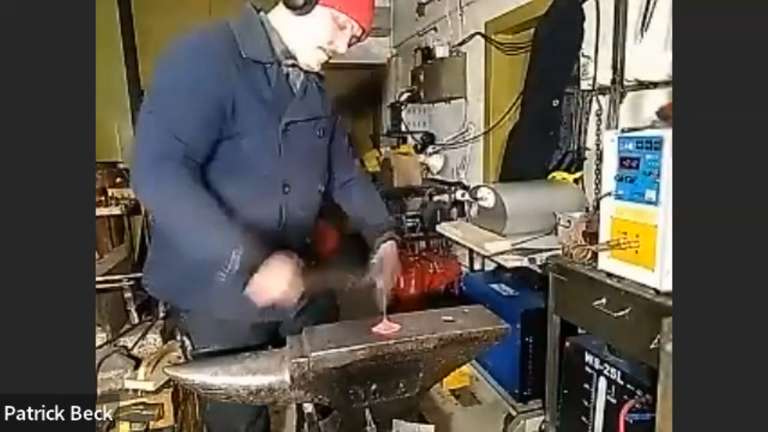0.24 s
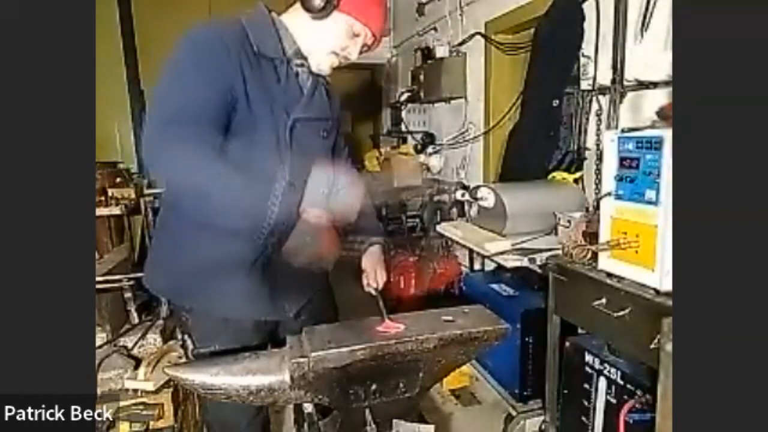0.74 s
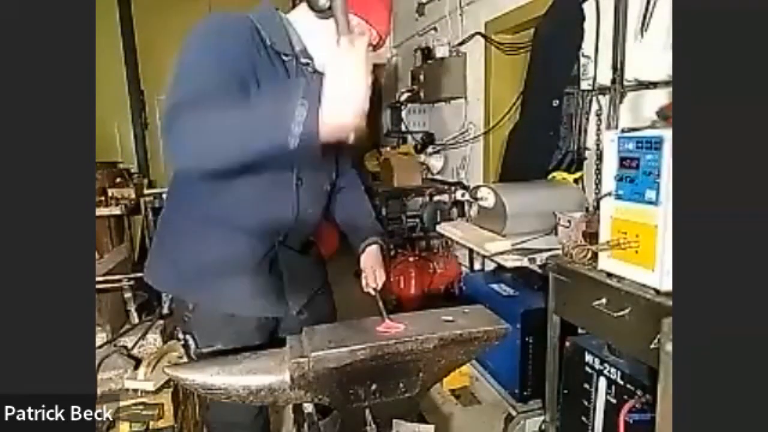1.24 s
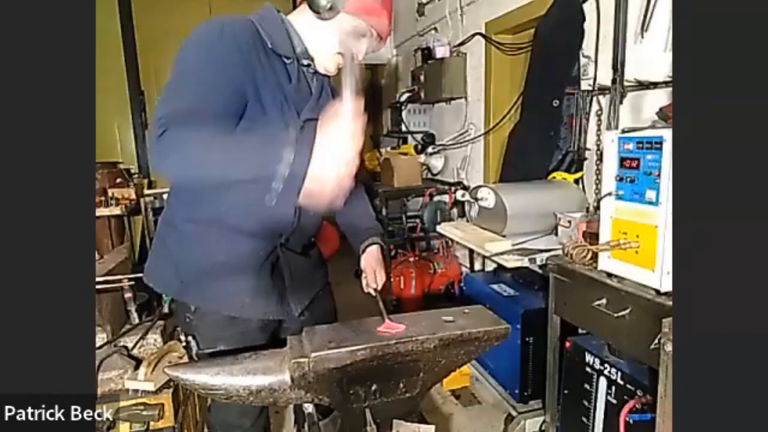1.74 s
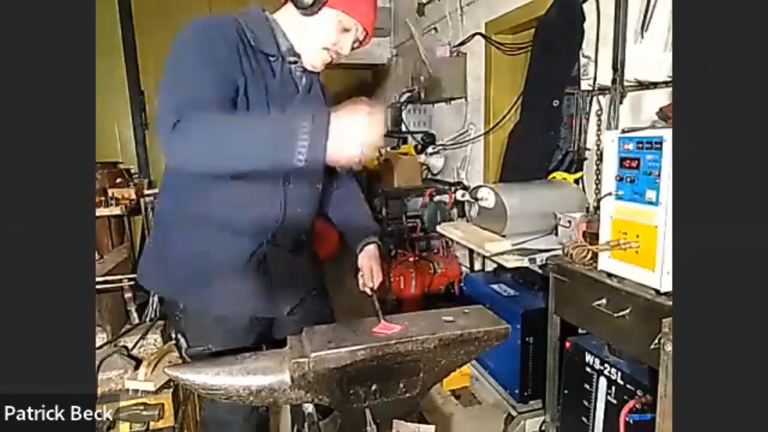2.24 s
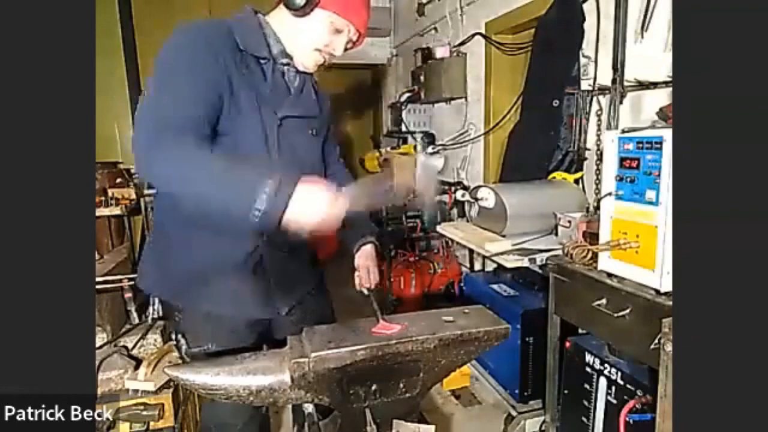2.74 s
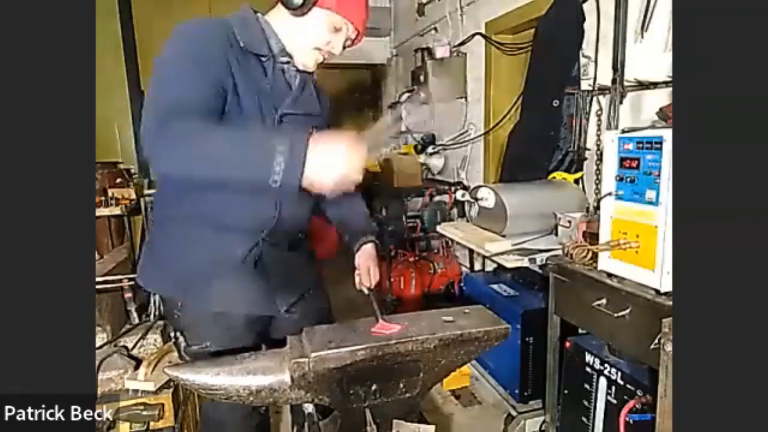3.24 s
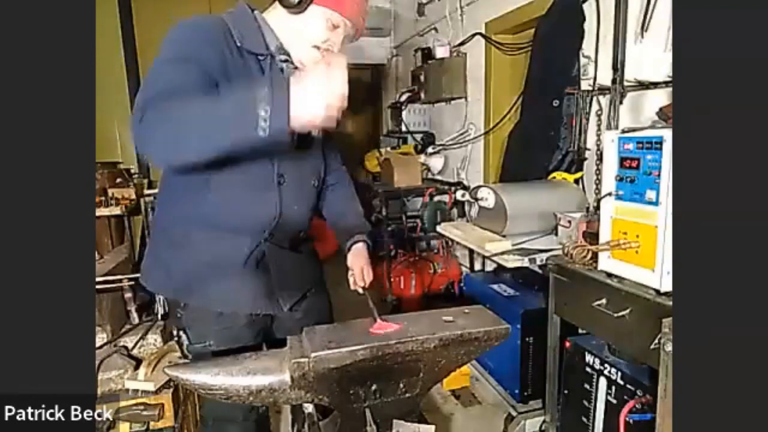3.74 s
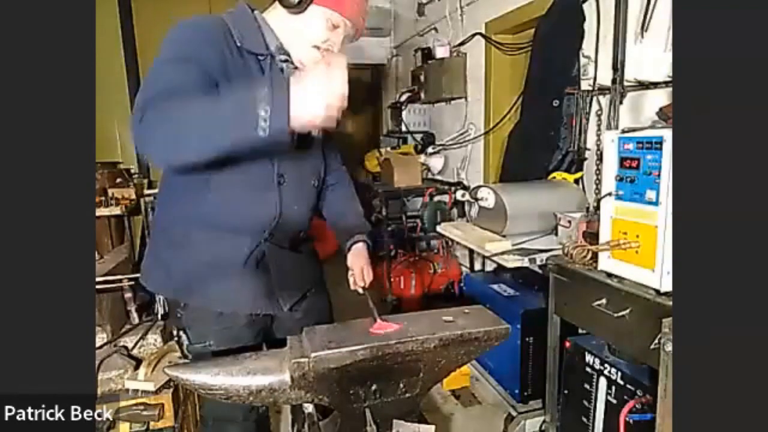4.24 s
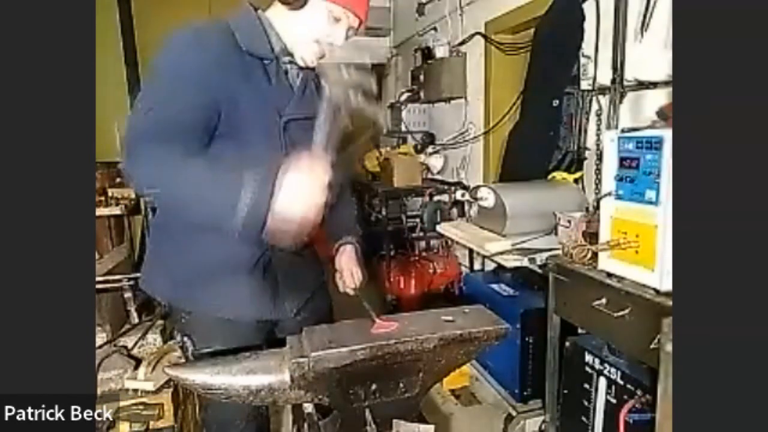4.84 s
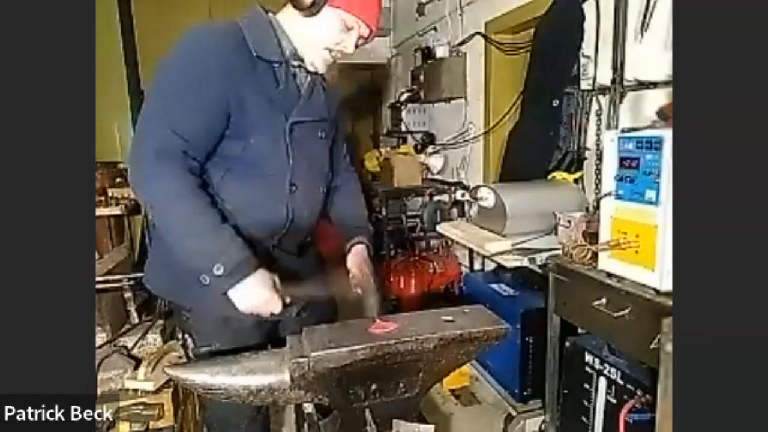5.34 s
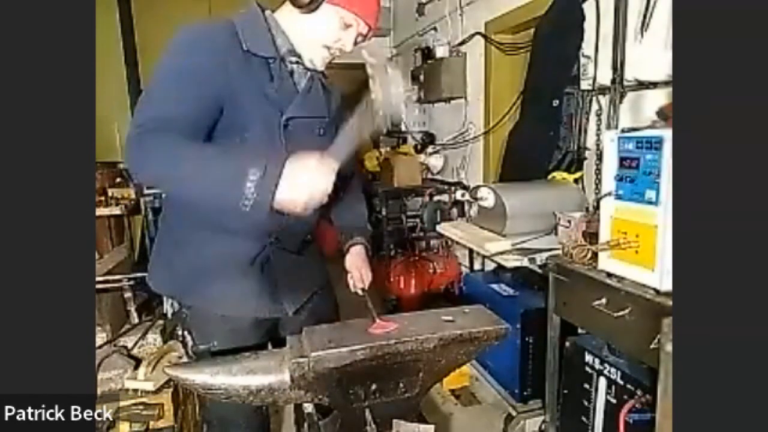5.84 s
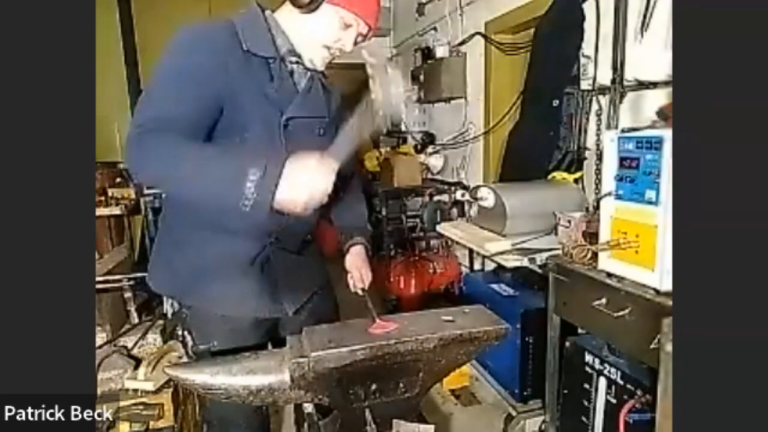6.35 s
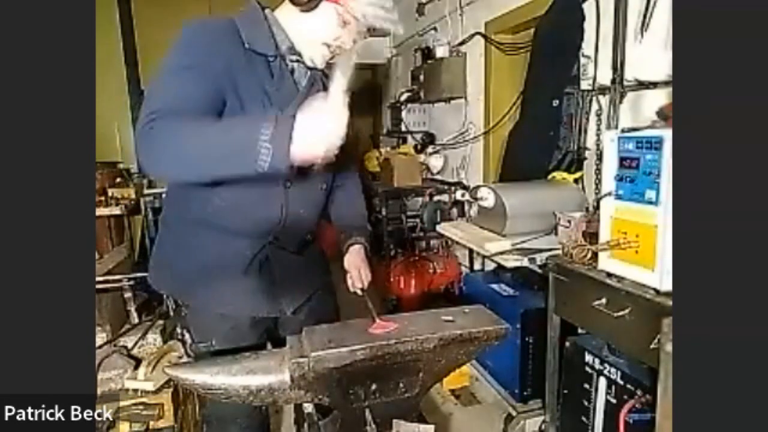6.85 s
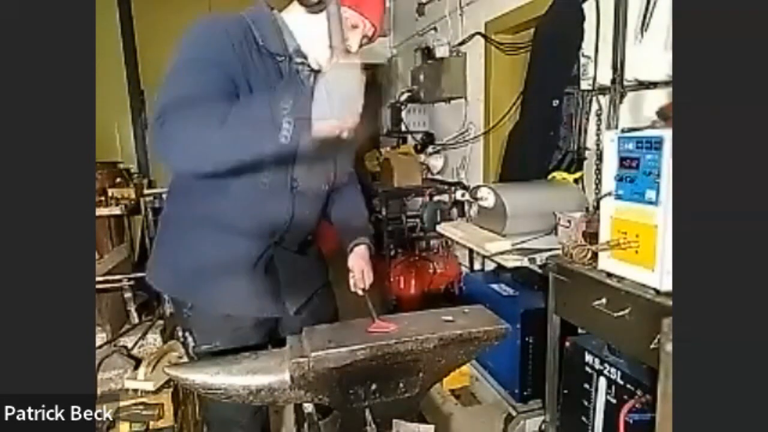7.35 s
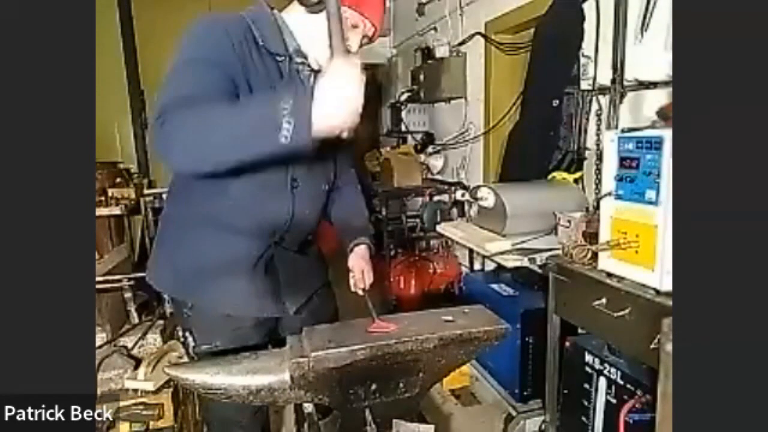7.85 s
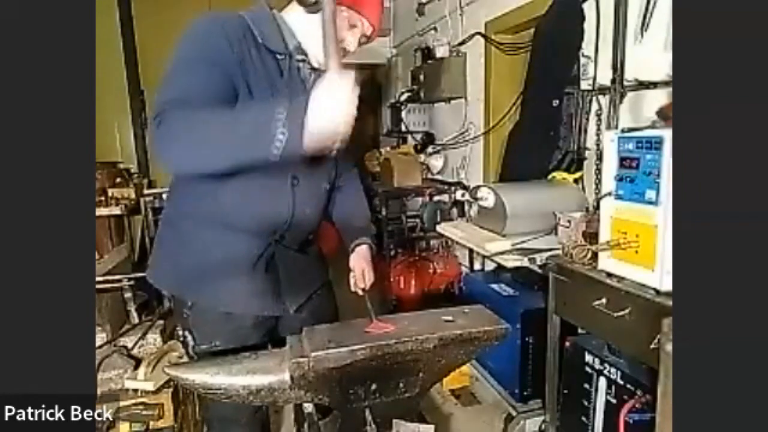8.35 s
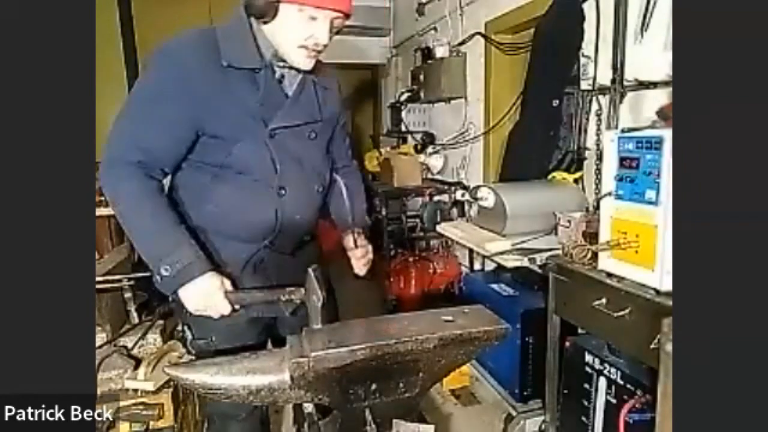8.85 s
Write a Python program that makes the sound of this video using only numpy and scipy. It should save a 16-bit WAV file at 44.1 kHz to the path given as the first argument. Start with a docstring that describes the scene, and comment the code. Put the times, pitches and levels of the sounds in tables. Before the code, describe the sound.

A hammer beats hot steel on an anvil about twice a second, each blow a ringing metallic clang in a small workshop.

```python
"""A hand hammer beats hot steel on an anvil, about two blows a second, in a small, live workshop.
Each blow sets the modes of anvil and hammer ringing, fills the room with a dying clang and gives the
stump below a short thump. The microphone feeds a mono call link: its noise suppressor cuts the tails
short and its limiter holds the first fifth of a second of each blow flat. A faint sizzle near 13 kHz
from the link follows each blow; faint hiss and flickering tones lie underneath."""
import sys
import numpy as np
from scipy import signal
from scipy.fft import rfft, irfft
from scipy.io import wavfile
from scipy.ndimage import uniform_filter1d, minimum_filter1d

SR = 44100
rng = np.random.default_rng(int(sys.argv[2]) if len(sys.argv) > 2 else 0)


def store_pcm(level_fs):
    """Save levels as 16-bit WAV."""
    pcm = np.round(np.clip(level_fs, -1, 1) * 32767).astype(np.int16)
    wavfile.write(sys.argv[1], SR, np.atleast_2d(pcm).T)


N = 401751

# hammer blows: (time [s], strength [dB], thump over strength [dB], treble decay stretch [x],
# then the landing [unitless]: glancing, along the face, across the face, hammer tilt)
BLOWS = [(0.017, -13, -20, 1.34, 2.18, -0.05, -1.64, 1.5), (0.519, -6.5, -24, 0.92, -3.27, 4, 2, 2),
         (1.033, -5, -23.5, 0.93, -1.9, 3.14, 0.56, 1.3), (1.547, -1, -10.5, 0.88, -2, 2.2, 1.2, -0.33),
         (2.12, -4.5, -28.5, 1.026, 3, -0.5, -0.24, -0.4),
         (2.656, -0.5, -36, 1.08, -1.05, -0.17, 0.58, 0.24),
         (3.148, -0.1, -13.5, 0.97, 0.5, 0.1, 1.05, -0.83),
         (3.628, 2.6, -33, 0.94, -0.3, -0.5, -0.042, -0.6),
         (4.121, -1.0, -32, 1.104, -0.16, -0.77, 0.21, -0.83),
         (4.648, 2.6, -26, 1.03, -1.15, -0.46, -0.11, 0.099), (5.158, 1.5, 5.5, 0.98, -1.5, 0.2, 0.37, 0.2),
         (5.694, 1.95, -6, 1.05, -2.1, -0.8, -0.18, 0.42),
         (6.195, -1.5, -13.5, 1.01, 1.16, 1.41, -0.59, -1.6),
         (6.737, 1, -20, 1.002, -2.34, -0.6, -0.036, -0.1), (7.255, -6, -11, 0.87, 1.16, 0.5, -1.73, 0.55),
         (7.827, -2, -20, 0.87, 0, 0.4, -1.2, -0.7), (8.351, -2.3, -25, 1.03, 0.1, 1.06, -1.42, 0.047),
         (8.864, 2, -1.5, 0.96, 0.7, -0.5, -0.5, -0.57)]
# reverberation of the workshop: (frequency [Hz], t60 [s])
ROOM_T60 = [(150, 0.53), (400, 0.53), (1500, 0.65), (4000, 0.58), (8000, 0.38), (12000, 0.59)]


def amp(db):
    return 10 ** (np.asarray(db) / 20)


def rms_one(x):
    return x / np.sqrt(np.mean(x ** 2) + 1e-20)


def at_hz(points, hz, column=1):
    """Read a table between its rows on a log frequency axis."""
    points = np.array(points)
    return np.interp(np.log(hz), np.log(points[:, 0]), points[:, column])


def drift(rate_hz):
    """Random wander below rate_hz, rms 1."""
    smooth = signal.butter(2, rate_hz, fs=SR, output="sos")
    return rms_one(signal.sosfilt(smooth, rng.standard_normal(N + 9000))[9000:])


def noise_bands(spectrum):
    """Steady noise of the given spectrum, at rms 1, split into third octaves: [(centre Hz, band)]."""
    hz = np.maximum(np.arange(N // 2 + 1) * SR / N, 1)
    shaped = rfft(rng.standard_normal(N)) * amp(at_hz(spectrum, hz))
    bins = rfft(rms_one(irfft(shaped, N)))
    thirds = 3 * np.log2(hz)
    return [(2 ** (k / 3), irfft(bins * np.maximum(1 - abs(thirds - k), 0), N)) for k in range(14, 43)]


def latest_blow():
    """Index of the blow sounding at each sample."""
    return np.maximum(np.searchsorted(np.array(BLOWS)[:, 0], np.arange(N) / SR) - 1, 0)


def struck(level_db, t60, rise_s):
    """Envelope: each blow swells with time constant rise_s and dies with its t60."""
    starts, blow = np.array(BLOWS)[:, 0], latest_blow()
    age = np.maximum(np.arange(N) / SR - starts[blow], 0)
    fallen_db = 60 * age / np.broadcast_to(t60, starts.shape)[blow]
    return amp(level_db[blow] - fallen_db) * -np.expm1(-age / rise_s)


def low_lag_db(even_db=-6.5, loss_per_db=0.76):
    """Gain per blow: harder blows add less to the lows."""
    return loss_per_db * (even_db - np.array(BLOWS)[:, 1])


def link_hiss(level_db=-81.5):
    """The call link's own faint, steady noise."""
    # hiss spectrum: (frequency [Hz], relative density [dB])
    spectrum = [(40, -5), (110, 0), (600, -7), (2000, -13), (11000, -20), (13000, -29)]
    return amp(level_db) * sum(band for _, band in noise_bands(spectrum))


def flickers():
    """Faint, soft-edged tones flicker up in the tails, each with a rough flutter."""
    # tones: (centre time [s], pitch [Hz], level [dB], length [s])
    tones = [(0.35, 500, -53.5, 0.037), (0.886, 575, -49.5, 0.086), (1.314, 870, -47, 0.013),
             (1.386, 500, -43, 0.026), (0.344, 4220, -64, 0.076), (1.923, 4230, -60, 0.11),
             (2.404, 850, -41.5, 0.015), (2.527, 560, -54.5, 0.035), (2.575, 1155, -59, 0.056),
             (2.576, 570, -60.5, 0.046), (2.585, 1880, -61.5, 0.046), (2.937, 870, -44, 0.015),
             (2.994, 560, -49, 0.019), (3.025, 688, -54.5, 0.069), (3.497, 663, -49, 0.053),
             (3.526, 239, -51.5, 0.037), (4.384, 840, -41, 0.012), (4.455, 248, -49, 0.038),
             (5.514, 557, -59.5, 0.044), (5.566, 860, -58.5, 0.065), (8.116, 321, -37.5, 0.046),
             (8.196, 3850, -66, 0.11), (8.199, 582, -53.5, 0.044), (8.221, 877, -52.5, 0.049),
             (8.638, 855, -50, 0.015)]
    out, t = np.zeros(N), np.arange(N) / SR
    for centre_s, hz, level_db, length_s in tones:
        near = slice(max(int((centre_s - .15) * SR), 0), int((centre_s + .15) * SR))
        swell = np.exp(-(2 * (t[near] - centre_s) / length_s) ** 2)
        out[near] += amp(level_db) * swell * np.sin(2 * np.pi * hz * t[near])
    return out * (1 + .6 * drift(110))


def stump_thump(hz=190, t60=0.018, late_s=0.0028):
    """The stump under the anvil answers each blow with a short, low push."""
    blows, kicks = np.array(BLOWS), np.zeros(N)
    kicks[((blows[:, 0] + late_s) * SR).astype(int)] = amp(blows[:, 1] + blows[:, 2])
    r, w = amp(-60 / (t60 * SR)), 2 * np.pi * hz / SR
    return signal.lfilter([0, np.sin(w)], [1, -2 * r * np.cos(w), r * r], kicks + 1e-18)


def room_clang(gain_db=-6, treble_db=2, rise_s=0.014, lumpy_db=2.08):
    """Dense small modes and the room merge to noise that dies band by band, in lumps as modes beat."""
    # clang spectrum: (frequency [Hz], relative density [dB])
    spectrum = [(30, -21.5), (340, -3.5), (500, -8), (800, -3.5), (1050, -8.5), (1650, -5), (2450, -7.5),
                (2950, -12.5), (4460, -13), (6000, -12), (7300, -10.5), (8500, -13.5), (11000, -19),
                (14500, -47.5)]
    # answer to the landing, lows then highs: (glancing, along, across, tilt) [dB per unit]
    landing_answer = [(0.37, 0.64, 0.1, 0.3), (-0.08, 0.1, 0.4, -0.3)]
    out, blows = 0, np.array(BLOWS)
    lumps = [drift(9) for _ in range(7)]
    for k, (hz, band) in enumerate(noise_bands(spectrum)):
        low = at_hz([(600, 0.95), (2000, 0.26)], hz)
        high = at_hz([(2500, 0.36), (6000, 0.86)], hz)
        landing_db = blows[:, 4:] @ (np.array([low, high]) @ landing_answer)
        level_db = blows[:, 1] + gain_db + low * low_lag_db() + high * treble_db + landing_db
        t60 = at_hz(ROOM_T60, hz) * blows[:, 3] ** high
        out += band * struck(level_db, t60, rise_s) * amp(lumpy_db * lumps[k % 7])
    return out


def anvil_ring_and_sizzle(echo_rise_s=0.0024, main_ring_lag=0.15):
    """Anvil and hammer modes reach the microphone as sines plus narrow noise off the walls.
    The top partial, near 13 kHz, is a faint sizzle from the call link that follows each blow."""
    # partials, the metal's modes and last the link's sizzle: (pitch [Hz])
    partial_hz = [(305), (361), (791), (899), (1443), (1561), (1717), (2040), (2676), (3262), (3311),
                  (3770), (4129), (4500), (5405), (5486), (6083), (6573), (6831), (7267), (7483), (8963),
                  (10185), (10993), (11079), (11477), (12920)]
    # the same partials: (level [dB], t60 [s])
    partial_decay = [(-20, 0.66), (-10, 0.43), (-20, 0.81), (-20, 0.44), (-22, 0.4), (-7, 0.66),
                     (-24.5, 0.36), (-18.5, 0.51), (-25.5, 0.47), (-24.5, 0.48), (-26, 0.7), (-23, .6),
                     (-27.5, 0.57), (-17.5, 0.51), (-30, 0.5), (-26, 0.46), (-33.5, 0.95), (-21.5, 0.62),
                     (-27.5, 1), (-23.5, 0.69), (-11.5, 0.44), (-35, 0.39), (-21.5, 0.29), (-23, 0.72),
                     (-19.5, 0.55), (-26.5, .55), (-25, 0.92)]
    # steadiness of the partials: (frequency [Hz], sine amplitude [0-1], waver width [Hz])
    waver = [(400, .4, 40), (1400, .4, 35), (1561, .78, 22), (1750, .4, 40), (3300, .4, 30),
             (4500, .05, 200), (5450, .15, 60), (6900, .15, 55), (7483, .4, 45), (11079, .5, 45),
             (11477, .1, 450)]
    # swell of the partials: (frequency [Hz], build-up [s])
    build_up = [(1400, .012), (1561, .3), (1717, .08), (1800, .015), (7483, .02), (10185, .004),
                (11000, .1)]
    # families of partials: (centre [Hz])
    family_hz = [1560, 1717, 2040, 2680, 3262, 3311, 3770, 4400, 5450, 6570, 7480, 10180, 11050, 11500]
    # each family's answer to the landing: (glancing, along, across, tilt) [dB per unit]
    family_answer = [(1.15, 0.96, 0.65, 2.1), (-0.5, -1, -8.5, -4), (-1, 1.2, 0.7, -0.2),
                     (-0.7, -3.2, -9, -4), (2.9, -2, -4, -1.5), (0.1, -5.5, 6, -2), (1.35, -3.5, 2.5, -0.5),
                     (-0.9, -5.5, 2.5, 0.2), (-5.5, 1.3, -6.5, -2.7), (-4, -1.8, -3, 2),
                     (-3, -0.8, -1.2, 0.2), (8, 6.5, 5, -1), (-3, 2, -2, -1.5), (-3.5, -0.5, 7, -4)]
    out, t = 0, np.arange(N) / SR
    blows, blow = np.array(BLOWS), latest_blow()
    white, phases = rng.standard_normal(N), rng.random((len(blows), len(partial_hz)))
    for k, (hz, (level_db, t60)) in enumerate(zip(partial_hz, partial_decay)):
        family = np.argmin(abs(np.log(hz / np.array(family_hz))))
        start_db = blows[:, 1] + level_db
        start_db += blows[:, 4:] @ family_answer[family] if hz > 1200 else low_lag_db()
        if 1200 < hz < 2050:   # harder blows also add a little less to the main ring
            start_db += main_ring_lag * low_lag_db()
        stretch = blows[:, 3] if hz > 3500 else 1
        steady, build_s = at_hz(waver, hz), at_hz(build_up, hz)
        sine = np.sqrt(2) * np.sin(2 * np.pi * (hz * t + phases[blow, k]))
        out += steady * sine * struck(start_db, t60 * stretch, build_s)

        r, w = np.exp(-np.pi * at_hz(waver, hz, column=2) / SR), 2 * np.pi * hz / SR
        noise = rms_one(signal.lfilter([1, 0, -1], [1, -2 * r * np.cos(w), r * r], white))
        noise_db = start_db - (8 if build_s > .2 else 0)   # the slow main ring starts faint
        noise_t60 = min(t60, at_hz(ROOM_T60, hz)) * stretch
        rise_s = echo_rise_s if hz < 2000 else build_s
        out += np.sqrt(1 - steady ** 2) * noise * struck(noise_db, noise_t60, rise_s)
    return out


def scene():
    """Clang, ring with sizzle, and thump, the same in both channels."""
    return np.tile(room_clang() + anvil_ring_and_sizzle() + stump_thump(), (2, 1))


def suppressor(x, slope=2.8, knee_db=5, shut_db=9, shut_slope=3.4, gate_db=-50, gate_slope=0.45):
    """Bands under the assumed noise level are pushed down, then shut; a gate closes on the whole sound."""
    # what the link takes for noise: (frequency [Hz], level per bin [dB])
    noise_floor = [(150, -59), (500, -58), (1560, -56.5), (4000, -70), (8000, -71), (12000, -58.5)]
    hz, _, bins = signal.stft(x, SR, nperseg=1024, noverlap=896)
    hz = np.maximum(hz, 1)
    bands = np.exp(-((hz[:, None] - hz) / (0.12 * hz[:, None] + 30)) ** 2)
    power = bands @ abs(bins) ** 2 / bands.sum(axis=1)[:, None]
    power = abs(uniform_filter1d(power, size=5, axis=1, origin=1)) + 1e-16
    under_db = at_hz(noise_floor, hz)[:, None] - 10 * np.log10(power)
    cut_db = slope * knee_db * np.logaddexp(0, under_db / knee_db)
    cut_db += shut_slope * np.maximum(under_db - shut_db, 0)
    whole_db = 10 * np.log10(np.sum(power * amp(-2 * np.minimum(cut_db, 70)), axis=0))
    cut_db += gate_slope * np.maximum(gate_db - whole_db, 0)
    cut_db += 3 * np.maximum(-64 - whole_db, 0)   # the last of the ring is shut out at once
    return signal.istft(bins * amp(-np.minimum(cut_db, 70)), SR, nperseg=1024, noverlap=896)[1][:N]


def limiter(x, limit_db=-21, sag=0.31, window_s=0.011, memory_s=0.14, ahead_s=0.04):
    """Gain drops ahead of the sound to hold its level at a ceiling that sags after louder peaks."""
    size, back, ahead = int(window_s * SR), int(memory_s * SR), int(ahead_s * SR)
    level_db = 10 * np.log10(abs(uniform_filter1d(x ** 2, size)) + 1e-14)
    peak_db = -minimum_filter1d(-level_db, back + ahead, origin=(back - ahead) // 2)
    ceiling_db = limit_db - sag * np.maximum(peak_db - limit_db, 0)
    gain_db = minimum_filter1d(np.minimum(ceiling_db - level_db, 0), size)
    return x * amp(uniform_filter1d(gain_db, size))


def record(dry, low_hz=100, high_hz=12050, cutoff_hz=14535):
    """The mono call link: band edges, suppressor, limiter, its own tones and hiss, then a top cut."""
    edges = np.vstack([signal.butter(2, low_hz, "high", fs=SR, output="sos"),
                       signal.ellip(6, .5, 16, high_hz, fs=SR, output="sos")])
    top_cut = signal.cheby2(12, 70, cutoff_hz, fs=SR, output="sos")
    microphone = signal.sosfilt(edges, dry[0])
    link = limiter(suppressor(microphone)) + link_hiss() + flickers()
    return np.tile(signal.sosfilt(top_cut, link), (2, 1))


dry = scene()
out = record(dry)
store_pcm(out)
```